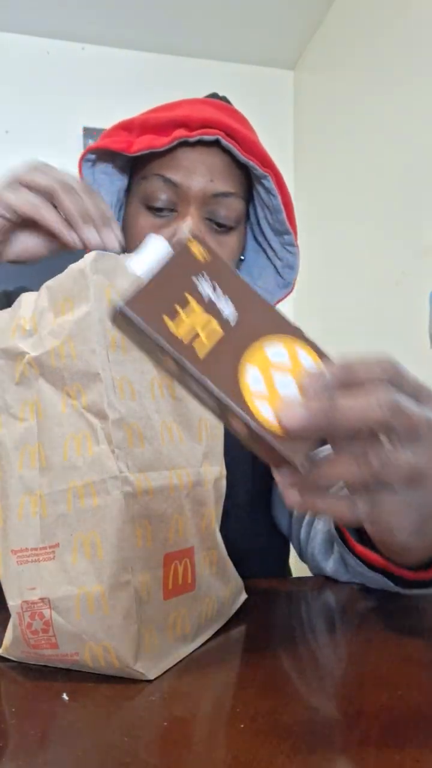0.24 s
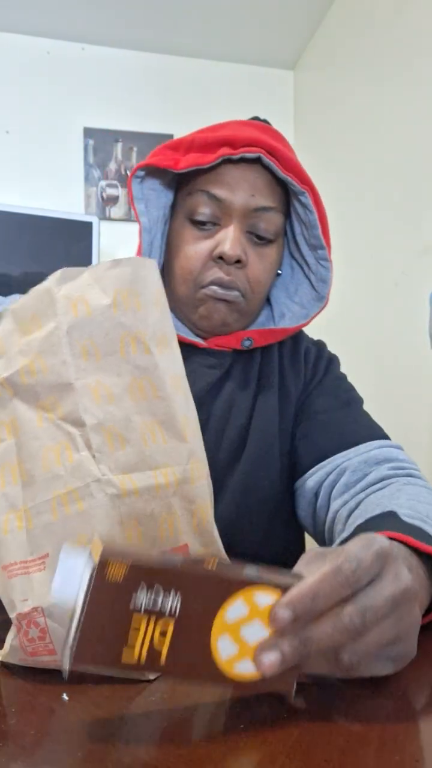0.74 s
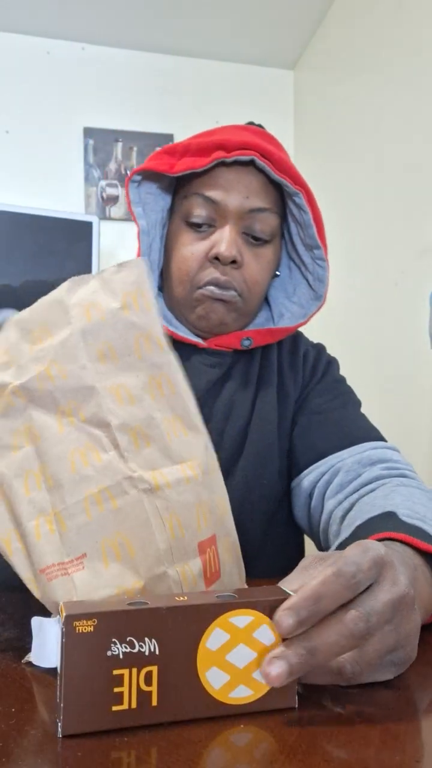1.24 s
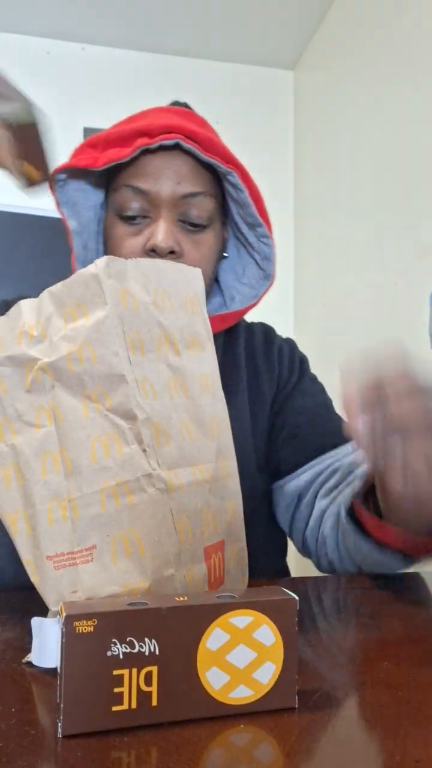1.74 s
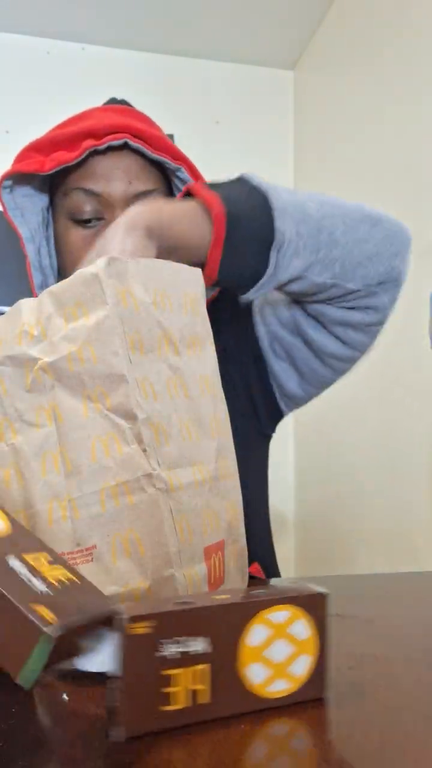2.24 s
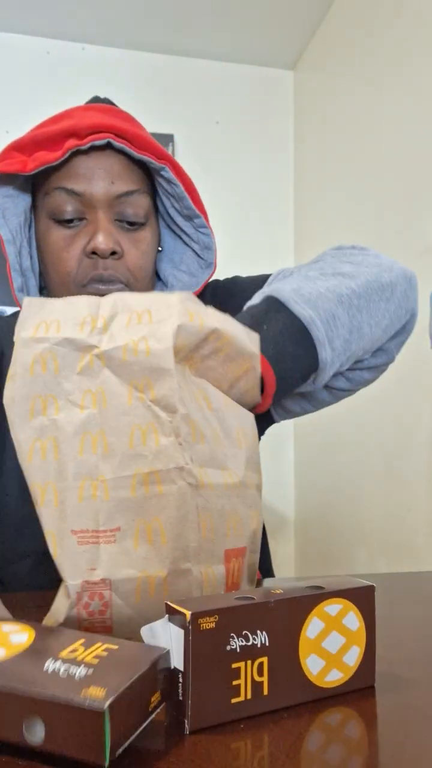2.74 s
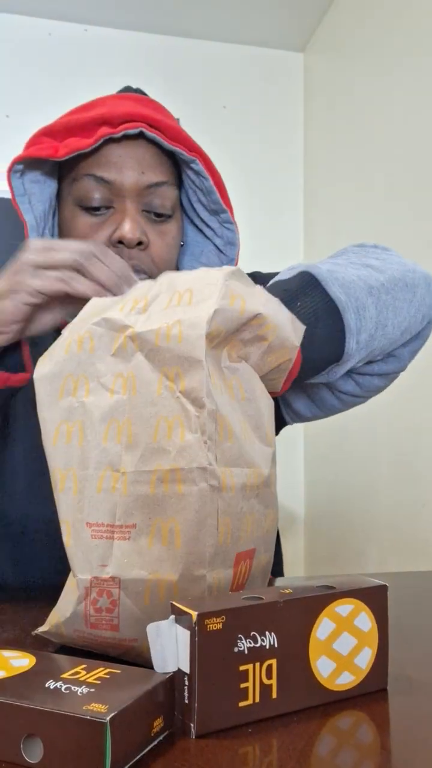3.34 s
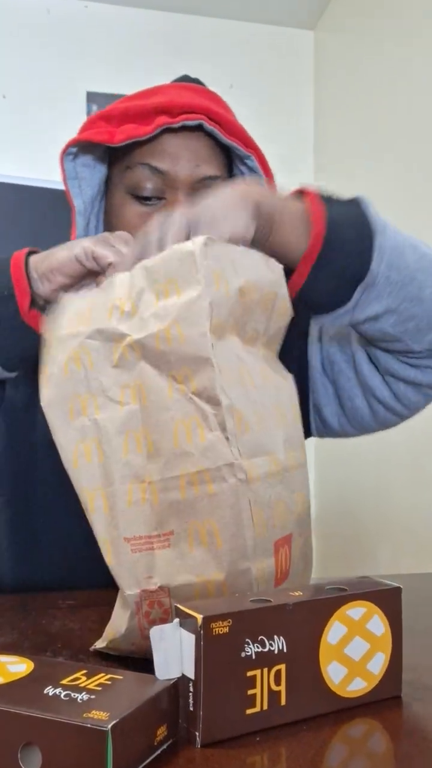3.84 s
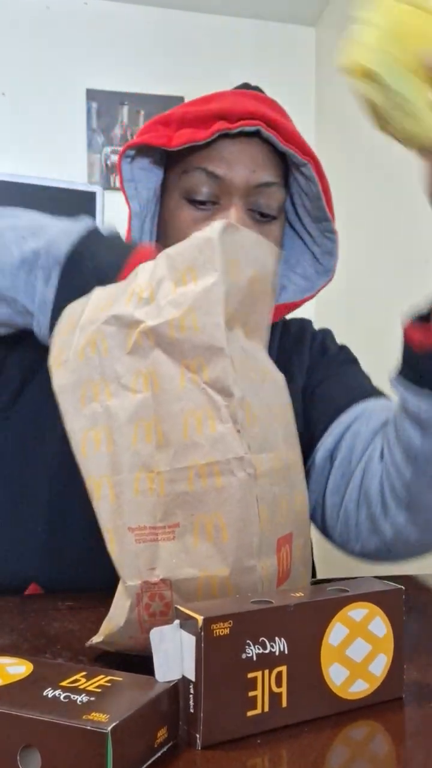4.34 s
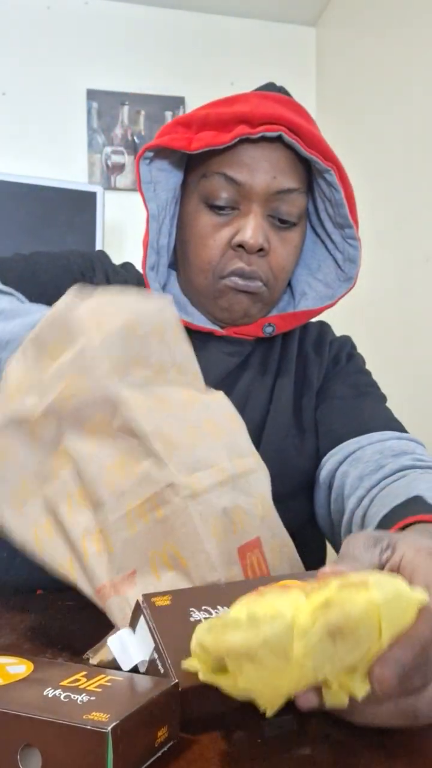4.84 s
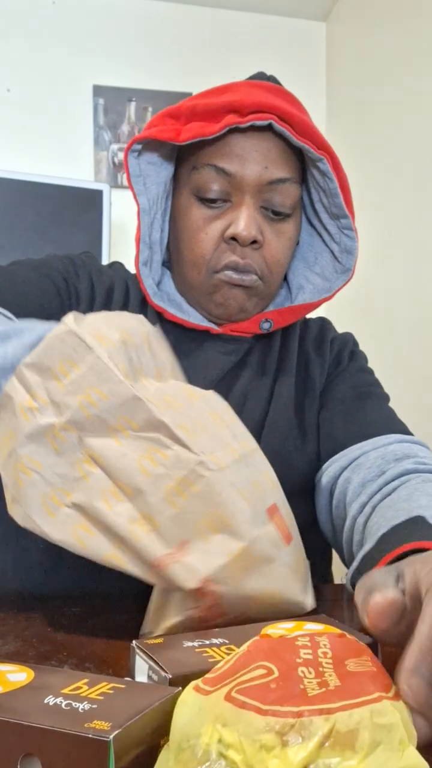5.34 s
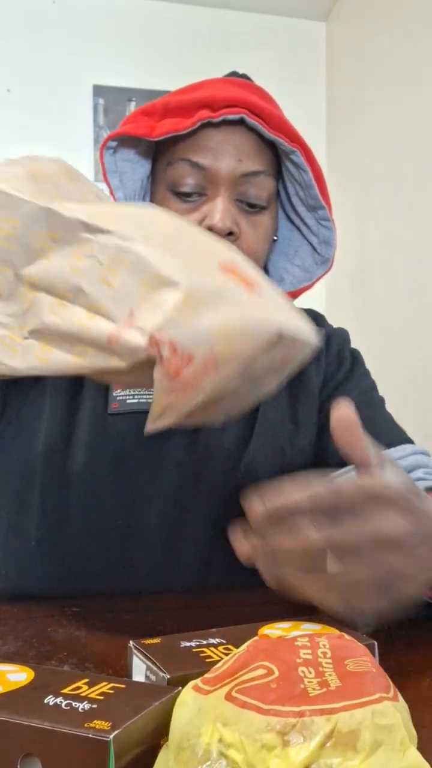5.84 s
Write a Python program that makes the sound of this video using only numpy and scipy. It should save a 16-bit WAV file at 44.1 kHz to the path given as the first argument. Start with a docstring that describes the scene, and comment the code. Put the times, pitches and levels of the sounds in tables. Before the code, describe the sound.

A stiff paper takeout bag crackles and pops close by as cartons and a wrapped sandwich come out onto a wooden table.

```python
"""A paper takeout bag on a wooden table, close to a phone in a small room with a faint appliance hum.
Hum and two faint ticks open; from 0.5 s a carton is set down while the other hand rummages, fading by 2.2 s.
From 2.25 s the arm goes in, gropes and draws out a wrapped sandwich; from 4.3 s it is laid down and the bag
lifted away. Paper is noise and short rings: facets pop, creases crackle, fibres fizz, panels flex.
Knocks ring table modes from 0.9 to 5.3 s, the hardest at 5.2 s; a decaying noise tail is the room."""
import sys
import numpy as np
from scipy import signal
from scipy.fft import rfft, irfft, next_fast_len
from scipy.io import wavfile

SR = 44100
rng = np.random.default_rng(int(sys.argv[2]) if len(sys.argv) > 2 else 0)


def materialize(psi):
    """Save the field psi as 16-bit PCM at rate SR to the path in sys.argv[1].

    A 1-D psi becomes a single channel; in a 2-D psi each row is a channel.
    """
    bounded = np.clip(np.atleast_2d(psi).T, -1, 1)
    quanta = np.round(bounded * 32767).astype(np.int16)
    wavfile.write(sys.argv[1], SR, quanta)


N = 268587
T = np.arange(N) / SR


def undb(db):
    """Decibels to amplitude gain."""
    return 10 ** (np.asarray(db) / 20)


def unit(x):
    """Scale to an rms of 1."""
    return x / np.sqrt(np.mean(x ** 2))


def at(points, hz):
    """Read (frequency, value) points on a log-frequency axis."""
    f, value = np.transpose(points)
    return np.interp(np.log(hz + 1e-9), np.log(f), value)


def decay(t, t60_s):
    """Exponential fade, 60 dB down after t60_s."""
    return np.exp(-np.log(1000) * t / t60_s)


def colour(x, points, size=4096):
    """Causal minimum-phase filter of the given (frequency, dB) shape and unit power gain."""
    log_gain = np.log(undb(at(points, np.fft.rfftfreq(size, 1 / SR))))
    cepstrum = irfft(log_gain)
    # fold the cepstrum to its causal half
    cepstrum[1:size // 2] *= 2
    cepstrum[size // 2 + 1:] = 0
    response = irfft(np.exp(rfft(cepstrum)))
    response /= np.linalg.norm(response)
    return signal.oaconvolve(x, response[None], axes=1)[:, :x.shape[1]]


# likeness of the two ports: (frequency [Hz], left-right correlation [0-1])
PORT_LIKENESS = [(100, 0.88), (600, 0.96), (1400, 0.32), (2500, 0.088), (5000, 0.012)]


def spread(pair):
    """Two unrelated signals to left and right: long waves reach both ports alike."""
    size = next_fast_len(pair.shape[1])
    alike = np.clip(at(PORT_LIKENESS, np.fft.rfftfreq(size, 1 / SR)), 0, 1)
    mid, side = rfft(pair, size) * np.sqrt([(1 + alike) / 2, (1 - alike) / 2])
    return irfft([mid + side, mid - side], size)[:, :pair.shape[1]]


def add(track, start_s, sound):
    """Mix a sound in at start_s, cut at the end of the track."""
    start = max(int(start_s * SR), 0)
    track[:, start:start + sound.shape[-1]] += sound[..., :max(N - start, 0)]


# still-room noise: (frequency [Hz], density [dB per Hz, relative])
AIR_COLOUR = [(25, -20), (60, 1.5), (120, -12), (170, -12), (260, -7.5), (380, -17), (650, -19), (950, -21),
              (1900, -12), (3200, -24.5), (8000, -23), (15000, -27.5)]
# appliance lines: (frequency [Hz], level [dB])
HUM_LINES = [(120, -70), (255, -77.5), (565, -86), (700, -87.5), (1906, -77), (2046, -88), (2616, -82.5)]
AIR_DB = -65


def still_air(waver_hz=5):
    """Faint room noise and appliance lines whose frequency wavers at random."""
    out = undb(AIR_DB) * unit(spread(colour(rng.standard_normal((2, N)), AIR_COLOUR)))
    for hz, db in HUM_LINES:
        # one random offset each 50 ms, joined by straight lines
        waver = waver_hz * np.interp(T * 20, np.arange(N), rng.standard_normal(N))
        phase = 2 * np.pi * np.cumsum(hz + waver) / SR
        out = out + undb(db) * np.sqrt(2) * np.sin(phase)
    return out


# standing waves: (frequency [Hz], level [dB], t60 [s])
STANDING_WAVES = [(52.7, -16, .45), (126.8, 2.5, 0.61), (254, -21, 0.47)]
ROOM_T60_S, ROOM_TREBLE_T60_S, ROOM_DB, ROOM_TREBLE_DB = 0.49, 0.11, -5, -7


def room(dry, build_s=0.0053, split_hz=3000, size=30000):
    """Near walls answer within a few ms; the treble dies sooner than the bass and the standing waves."""
    t = np.arange(size) / SR
    noise = spread(rng.standard_normal((2, size)))
    low = signal.sosfilt(signal.butter(2, split_hz, fs=SR, output="sos"), noise)
    high = signal.sosfilt(signal.butter(2, split_hz, "high", fs=SR, output="sos"), noise)
    build = 1 - np.exp(-(t / build_s) ** 2)
    tail = 0
    for band, t60_s, db in (low, ROOM_T60_S, ROOM_DB), (high, ROOM_TREBLE_T60_S, ROOM_TREBLE_DB):
        fade = decay(t, t60_s) * build
        tail = tail + undb(db) * band * fade / np.linalg.norm(fade)
    for hz, db, t60_s in STANDING_WAVES:
        fade = decay(t, t60_s)
        tail = tail + 2 * undb(db) * np.cos(2 * np.pi * hz * t) * fade / fade.sum()
    return dry + signal.oaconvolve(dry, tail, axes=1)[:, :N]


# things set down or bumped on the table: (time [s], level [dB], contact time [ms])
TABLE_BLOWS = [(0.867, -17.5, 1.7), (0.913, -18, 2.4), (1.013, -18, 5), (1.416, -21, 1.4),
               (1.454, -20.5, 1.9), (2.256, -15, 7), (2.267, -32.5, 0.46), (2.893, -18.5, 2.1),
               (3.137, -22, 1.7), (3.254, -22.5, 0.51), (3.573, -22.5, 0.97), (4.006, -29.5, 0.37),
               (4.508, -24, 1.9), (4.72, -22, 0.86), (4.833, -17.5, 0.87), (5.2, -10, 0.94),
               (5.237, -21, 1.6), (5.281, -30, 6.9)]
# modes of the table top: (frequency [Hz], level [dB], t60 [s])
TABLE_MODES = [(55, -30, 0.29), (71.5, -13, 0.052), (129.9, -16.5, 0.16), (246, -20, 0.19),
               (304.7, -8.5, 0.08), (384, -0.5, 0.045), (467.7, -4.5, 0.038), (656, -5, 0.054),
               (840, 1, 0.023), (1120, -2, 0.023), (1440, -16, .02)]


def knocks(detune=0.018, size=22050):
    """Blows ring the table top; a longer contact weakens its high modes."""
    t, out = np.arange(size) / SR, np.zeros((2, N))
    hz, mode_db, t60_s = np.transpose(TABLE_MODES)[:, :, None]
    for start_s, blow_db, contact_ms in TABLE_BLOWS:
        f = hz * (1 + detune * rng.standard_normal(hz.shape))
        push = 1 / (1 + (f * contact_ms / 1000) ** 2)
        modes = push * undb(mode_db) * np.sin(2 * np.pi * f * t) * decay(t, t60_s)
        add(out, start_s, -undb(blow_db) * modes.sum(axis=0))
    return out


# crackling creases: (frequency [Hz], density [dB per Hz, relative])
CREASE_COLOUR = [(900, -20.5), (2000, 3), (3000, -0.5), (4000, -0.5), (6000, -3.5), (7500, -2), (8700, -8),
                 (11000, -28)]
# fizzing fibres: (frequency [Hz], density [dB per Hz, relative])
FIBRE_COLOUR = [(6000, -65.5), (8500, 7.5), (9600, 4), (11300, 6), (15500, 2.5)]


def cracks(rows, rise_s, fade_s, after_db, after_s, size=2048):
    """A crease gives way in a quick run of tiny slips, then settles; rows are (time, crack dB, fizz dB)."""
    t = np.arange(size) / SR
    settling = undb(after_db) * np.exp(-t / after_s)
    run = (1 - np.exp(-t / rise_s)) * (np.exp(-t / fade_s) + settling)
    crease, fibre = np.zeros((2, 2, N))
    for start_s, crack_db, fizz_db in rows:
        slips = run * rng.standard_normal((2, size))
        add(crease, start_s, undb(crack_db) * slips)
        add(fibre, start_s, undb(fizz_db) * slips)
    return colour(crease, CREASE_COLOUR) + colour(fibre, FIBRE_COLOUR)


# lone ticks close to the ports: (time [s], crack level [dB], fizz level [dB]), relative
THIN_PAPER_TICKS = [(0.4076, -46, -54), (0.458, -56, -59), (0.8085, -38, -31), (1.117, -35, -43),
                    (2.1356, -49, -42), (2.259, -45, -34), (4.059, -52, -45.5), (4.1525, -39, -39),
                    (4.2144, -46.5, -40), (4.2592, -41, -45), (4.2772, -35, -23), (4.487, -44, -25)]


def near_ticks(gain_db=12):
    """Thin paper slips close to the ports in bursts of crease and fibre noise."""
    bursts = cracks(THIN_PAPER_TICKS, rise_s=.0002, fade_s=.0006, after_db=-29, after_s=.014)
    return undb(gain_db) * bursts


# pushes and pulls of the hands on the paper: (start [s], length [s], effort [dB],
# extra fizz of thin or sliding paper [dB], extra flexing of the panels [dB])
HAND_STROKES = [ (0.488, .06, -49.5, 7.5, 3), (0.531, 0.086, -44, 6, -1), (0.595, 0.16, -35.5, 0, 1),
                (0.783, 0.15, -34, 1.5, 5), (0.922, 0.2, -39.5, -1, 3), (1.147, .07, -34, 2, -4),
                (1.249, 0.22, -38.5, 3, 1.5), (1.49, 0.11, -51.5, -3, -12), (1.664, 0.06, -56.5, -12, -16),
                (1.841, 0.028, -55.5, -2, 0), (2.042, .04, -58, -5, -10), (2.082, 0.041, -54, 4, -12),
                (2.25, 0.02, -43.5, 4, 16.5), (2.29, 0.099, -54, 7, 7), (2.351, 0.17, -39.5, 4.5, 4),
                (2.484, 0.22, -31, 3, -1), (2.642, 0.077, -31, 2.5, -9), (2.752, 0.14, -34, -3, -1),
                (2.914, 0.083, -43, -0.5, 5.5), (3.003, 0.091, -37.5, 0.5, 1.5),
                (3.087, 0.19, -34, -0.5, -2), (3.32, 0.19, -41, 5.5, -4), (3.453, 0.089, -38, 1, 2),
                (3.533, 0.14, -33.5, 0, -15), (3.694, 0.083, -37.5, 6.5, -8), (3.79, 0.078, -42, -4, 3),
                (3.847, 0.07, -35.5, 7.5, -2), (3.943, 0.1, -46.5, -2, -11), (4.063, 0.1, -55, 3, -14),
                (4.193, 0.09, -60, 13, -4), (4.294, 0.058, -41.5, 7.5, -3), (4.348, 0.094, -39, 2, 1.5),
                (4.397, 0.15, -35, 0.5, 4), (4.546, 0.17, -35, 1.5, -3), (4.707, 0.047, -32.5, 6.5, 8.5),
                (4.798, 0.061, -30.5, 4, -7), (4.874, .16, -32, 0.5, 5), (5.042, 0.14, -33.5, 7, -14),
                (5.223, 0.3, -41.5, 4.5, 0), (5.43, 0.095, -36.5, 1, -5.5), (5.564, 0.12, -45.5, 0, -1),
                (5.747, 0.28, -57.5, 6.5, 6), (6.045, 0.013, -31, -1, -4)]
ATTACK_S, RELEASE_DB_PER_S = 0.0072, 195
SWELL_SHARE = 0.21  # added to the attack, as a share of stroke length
FIRM_DB, POP_GROWTH_DB_PER_DB = -35, 1.084  # effort of a firm grip; pop growth with effort


def stroke_gains():
    """Each stroke takes hold, keeps its effort and lets go; gains of facets, creases, fibres and panels."""
    power = np.zeros((4, N))
    for start_s, length_s, effort_db, fizz_db, flex_db in HAND_STROKES:
        hold = np.clip((T - start_s) / (ATTACK_S + SWELL_SHARE * length_s), 0, 1)
        release = undb(-RELEASE_DB_PER_S * np.clip(T - start_s - length_s, 0, 1))
        pop_db = FIRM_DB + POP_GROWTH_DB_PER_DB * (effort_db - FIRM_DB)
        levels_db = [pop_db, effort_db, effort_db + fizz_db, effort_db + flex_db]
        power += np.outer(undb(levels_db) ** 2, (hold * release) ** 2)
    return np.sqrt(power)


def facets(per_second=480, centre_hz=950, octaves=0.835, size_spread_db=3.0, cycles=2.35,
           rise_cycles=0.18, size=1100):
    """Small facets pop one by one, each ringing a few cycles at a random pitch of its own."""
    t, out = np.arange(size) / SR, np.zeros((2, N))
    where = np.flatnonzero(rng.random(N) < per_second / SR)
    pitch, strength, left, right = rng.standard_normal((4, N))[:, where, None]
    hz = np.clip(centre_hz * 2 ** (octaves * pitch), 220, 5000)
    shape = np.exp(-hz * t / cycles) * (1 - np.exp(-hz * t / rise_cycles))
    # high facets die sooner, so they start louder for the same energy
    loud = undb(size_spread_db * np.minimum(strength, 1)) * np.sqrt(hz) * shape
    rings = np.stack([loud * np.sin(2 * np.pi * (hz * t + turn)) for turn in (left, right)], axis=1)
    for start, ring in zip(where, rings):
        add(out, start / SR, ring)
    return unit(out)


def crackle(where, sizes, lo_hz, count, patchy_db, cycles):
    """Each tiny buckle rings half-octave resonances of the sheet in a mix of its own."""
    out = np.zeros((2, N))
    for hz in lo_hz * 2 ** (np.arange(count) / 2):
        mix = undb(patchy_db * rng.standard_normal(len(where)))
        kicks = sizes * mix * rng.standard_normal((2, len(where)))
        train = np.array([np.bincount(where, k, N) for k in kicks])
        out += signal.lfilter(*signal.iirpeak(hz, cycles, SR), train)
    return out


# pops favoured by the stiff sheet: (frequency [Hz], level [dB])
SHEET_COLOUR = [(130, -7), (280, -3.5), (450, 1), (650, -2), (950, -4), (1300, 1.5), (1700, 1.5),
                (2200, -7), (3000, -3), (5000, -15)]
# flexing panels: (frequency [Hz], density [dB per Hz, relative])
PANEL_COLOUR = [(22, -31), (40, 4), (55, 4), (90, 1), (130, 3), (170, 0.5), (205, 1), (250, -2.5),
                (340, -0.5), (500, -13.5), (900, -31)]


def rustle(gains, per_second=1300, size_spread_db=0.1, facet_db=1.5, crease_db=1, fibre_db=-5.5,
           panel_db=-9, slide_db=-1):
    """Popping facets, crackling creases, fizzing fibres, flexing panels and the hiss of sliding paper."""
    facet, crease, fibre, panel = gains
    where = np.flatnonzero(rng.random(N) < per_second / SR)
    sizes = undb(size_spread_db * np.minimum(rng.standard_normal(N)[where], 2))
    slide = undb(slide_db) * rng.standard_normal((2, N))
    grit = unit(crackle(where, sizes, 1785, count=7, patchy_db=-0.5, cycles=2.74)) + slide
    flex = crackle(where, sizes, 43.6, count=8, patchy_db=4.0, cycles=5.9)
    out = undb(facet_db) * facet * unit(colour(facets(), SHEET_COLOUR))
    out += undb(crease_db) * crease * unit(colour(grit, CREASE_COLOUR))
    out += undb(fibre_db) * fibre * unit(colour(grit, FIBRE_COLOUR))
    out += undb(panel_db) * panel * unit(colour(flex, PANEL_COLOUR))
    return spread(out)


def small_buckles(effort, per_second=12, centre_hz=1200, octaves=0.57, pop_db=4, crack_db=-1, scatter_db=3):
    """Lesser buckles come by chance, as strong as the hand is pressing; rows as in LOUD_BUCKLES."""
    where = np.flatnonzero(rng.random(N) < per_second / SR)
    pitch, pop, crack = np.clip(rng.standard_normal((3, N))[:, where], -2, 2)
    effort_db = 20 * np.log10(effort[where] + 1e-9)
    hz = centre_hz * 2 ** (octaves * pitch)
    pops_db = effort_db + pop_db + scatter_db * pop
    cracks_db = effort_db + crack_db + scatter_db * crack
    return np.column_stack([where / SR, hz, pops_db, cracks_db])


def followers(rows, count=1, soonest_s=.002, within_s=.005, pop_db=-7, crack_db=-7, octaves=.35):
    """A loud buckle loads its neighbours, which give way a few ms later, weaker and at other pitches."""
    start_s, hz, pop, crack = np.repeat(rows, count, axis=0).T
    wait, pitch = rng.random((len(start_s), 2)).T
    later_s = start_s + soonest_s + within_s * wait
    new_hz = hz * 2 ** (octaves * (2 * pitch - 1))
    return np.column_stack([later_s, new_hz, pop + pop_db, crack + crack_db])


# shudder of the sheet: (frequency [Hz], density [dB per Hz, relative])
SHUDDER_COLOUR = [(130, -20), (280, -2), (450, -3), (650, 0.5), (950, 5.5), (1300, 9.5), (1700, 8.5),
                  (2200, -3), (3000, -8), (5000, -38.5)]
# harder cracks tear more fibres: fizz at a loud crack, and its growth
LOUD_CRACK_DB, LOUD_FIZZ_DB, FIZZ_GROWTH_DB_PER_DB = -19.5, -23, 1.6


def snaps(rows, ring_s=0.0017, sheet_db=-3, ring_db=7, crack_db=5, side_db=-5, overtone=1.45, size=2048):
    """A facet flips over: a few cycles at its own pitch, a shudder of the sheet, a crack along the crease."""
    t = np.arange(size) / SR
    rings, sheets = np.zeros((2, 2, N))
    swell, shudder = 1 - np.exp(-t / .00025), np.exp(-t / .005)
    ratios = np.array([[1], [overtone]])
    ring_levels_db = ring_db + np.array([[0], [side_db]])
    creases = []
    for start_s, hz, pop_db, snap_crack_db in rows:
        ring = -np.sin(2 * np.pi * hz * t * ratios) * np.exp(-t / ring_s)
        add(rings, start_s, undb(pop_db + ring_levels_db) * swell * ring)
        noise = rng.standard_normal((2, size))
        add(sheets, start_s, undb(pop_db + sheet_db) * swell * shudder * noise)
        fizz_db = LOUD_FIZZ_DB + FIZZ_GROWTH_DB_PER_DB * (snap_crack_db - LOUD_CRACK_DB)
        creases.append((start_s, snap_crack_db, fizz_db))
    edges = cracks(creases, rise_s=.0005, fade_s=.0017, after_db=-19, after_s=.012)
    return spread(rings + colour(sheets, SHUDDER_COLOUR) + undb(crack_db) * edges)


# single loud buckles: (time [s], facet pitch [Hz], pop level [dB], crack level [dB]), relative
LOUD_BUCKLES = [(0.6093, 690, -25, -36), (0.6144, 1100, -23, -31), (0.6291, 640, -25, -25),
                (0.6739, 750, -17.5, -22.5), (0.8076, 1850, -29, -25.5), (0.8442, 1240, -18, -21),
                (0.8634, 700, -12.5, -20), (0.89, 624, -26, -16), (0.9106, 1410, -17.5, -32),
                (0.9371, 835, -26, -26), (0.9519, 870, -22, -24), (1.0135, 656, -22.5, -29),
                (1.0653, 614, -17.5, -28), (1.1585, 1805, -23.5, -28), (1.1695, 645, -22, -40),
                (1.1794, 717, -20, -38), (1.199, 650, -19, -41), (1.2021, 1260, -14.5, -20.5),
                (1.2772, 1830, -29, -31), (1.3392, 970, -22, -25), (1.4504, 620, -25, -20),
                (1.559, 626, -30.5, -40), (1.6838, 1050, -36.5, -37.5), (2.0448, 1110, -39, -45.5),
                (2.2537, 1570, -28, -37), (2.2963, 1160, -27, -60), (2.4007, 1580, -25, -42),
                (2.4939, 1330, -28, -22), (2.5276, 524, -22, -31), (2.5833, 660, -19, -18.5),
                (2.6197, 2270, -25, -20), (2.662, 1330, -36, -15.5), (2.6915, 1580, -22, -15),
                (2.7329, 670, -20, -25), (2.7938, 595, -25, -29), (2.813, 1190, -19, -23.5),
                (2.8706, 570, -21.5, -29), (2.9049, 1370, -18, -60), (3.1377, 1130, -16, -39),
                (3.18, 1260, -20.5, -26), (3.2519, 1630, -21, -24.5), (3.2701, 1210, -19.5, -48),
                (3.4814, 1800, -23, -21), (3.5704, 1440, -21.5, -25), (3.7637, 1750, -29.5, -25.5),
                (3.8625, 1360, -28, -34), (4.004, 1620, -21, -30.5), (4.0902, 670, -38, -34.5),
                (4.4368, 1240, -23, -23), (4.4839, 1300, -19.5, -38), (4.5118, 620, -18.5, -21),
                (4.5196, 1000, -21.5, -22), (4.6507, 1270, -18, -26), (4.7442, 584, -22.5, -26.5),
                (4.8149, 1310, -17, -36), (4.8329, 1230, -13.5, -21.5), (4.9124, 676, -20.5, -23),
                (4.9206, 1640, -13, -30), (4.9838, 1120, -20.5, -35), (5.0147, 1290, -17.5, -20),
                (5.057, 1690, -11, -23), (5.0756, 1720, -31, -21.5), (5.1371, 695, -20, -25.5),
                (5.1817, 1030, -21.5, -30), (5.1992, 635, -13.5, -53), (5.3033, 610, -24, -29),
                (5.5174, 1790, -26.5, -33), (5.7868, 694, -30.5, -46), (6.0582, 1090, -23, -21.5)]


def scene():
    """Paper and table in the room; the nearest ticks and the still air stay dry."""
    ticks = near_ticks()
    gains = stroke_gains()
    crease_effort = gains[1]
    buckles = np.vstack([LOUD_BUCKLES, followers(LOUD_BUCKLES), small_buckles(crease_effort)])
    handling = rustle(gains) + snaps(buckles) + knocks()
    return room(handling) + ticks + still_air()


# colour of the two microphone ports: (frequency [Hz], left level [dB], right level [dB])
PORT_COLOUR = [(100, 3, 2.5), (417, -1, 1), (700, 3, 6), (1390, -1, 3), (2520, 3, 1.5), (4500, 4, 3.5),
               (8400, 0.5, 1), (8900, -13.5, -7), (10700, -7, 3), (16700, -12, 9.5)]
RUMBLE_HZ, TOP_HZ = 44, 15900


def record(dry):
    """Each port has its own colour, the left much duller; rumble and top are cut, peaks rounded by tanh."""
    size = next_fast_len(N + SR // 10)
    f, ports = np.fft.rfftfreq(size, 1 / SR), np.array(PORT_COLOUR)
    gains = undb([at(ports[:, [0, side]], f) for side in (1, 2)])
    rumble_cut = f ** 5 / np.sqrt(f ** 10 + float(RUMBLE_HZ) ** 10)
    heard = irfft(rfft(dry, size) * gains * rumble_cut, size)[:, :N]
    top_cut = signal.ellip(10, .2, 80, TOP_HZ, fs=SR, output="sos")
    return signal.sosfilt(top_cut, np.tanh(heard))


dry = scene()
out = record(dry)
materialize(out)
```